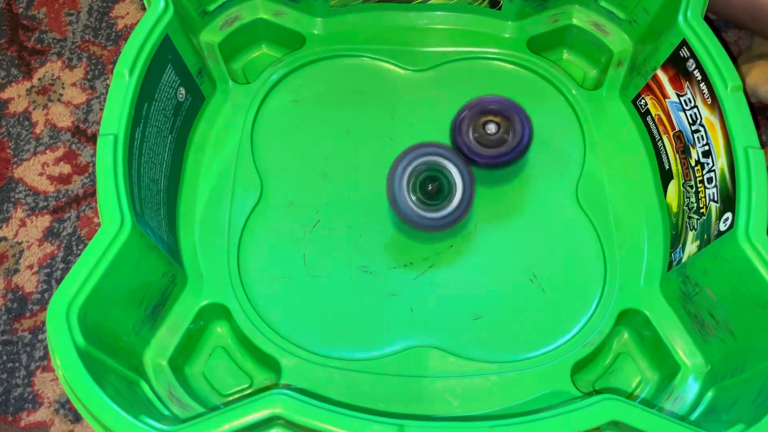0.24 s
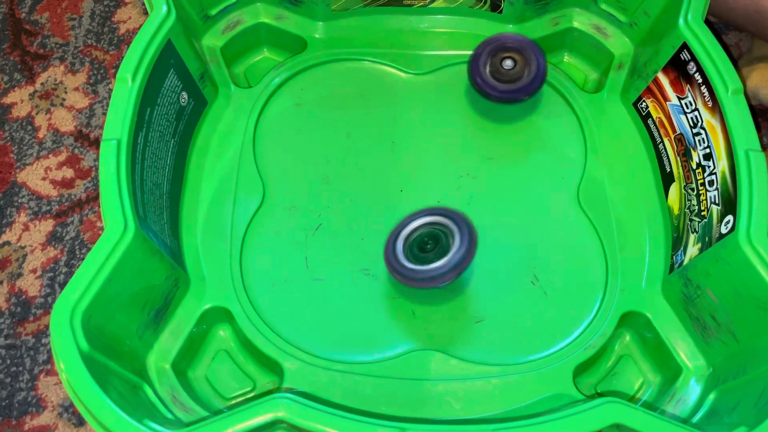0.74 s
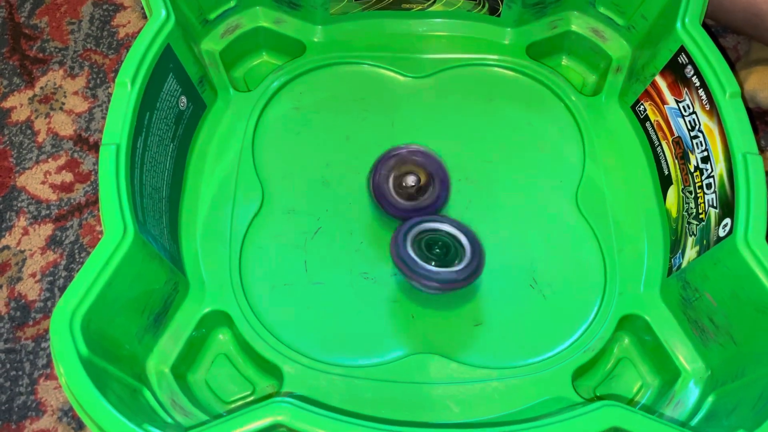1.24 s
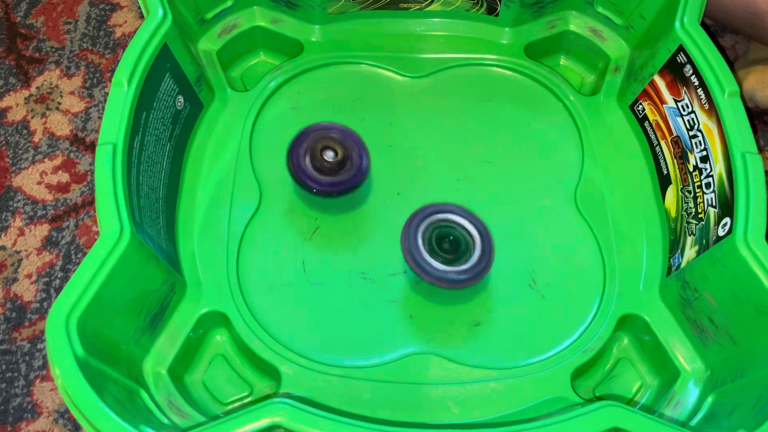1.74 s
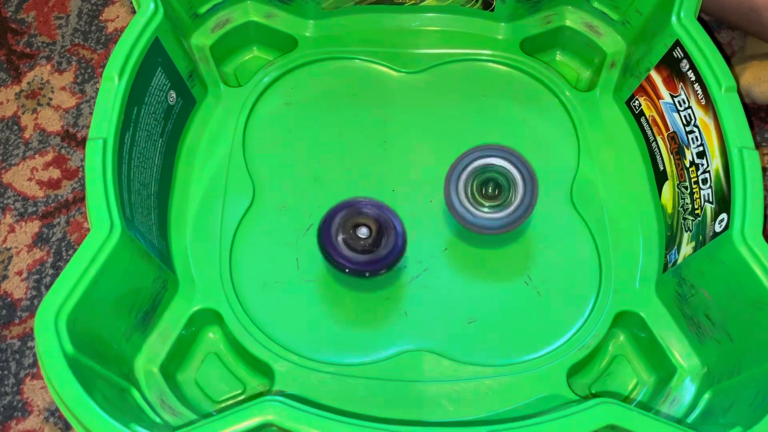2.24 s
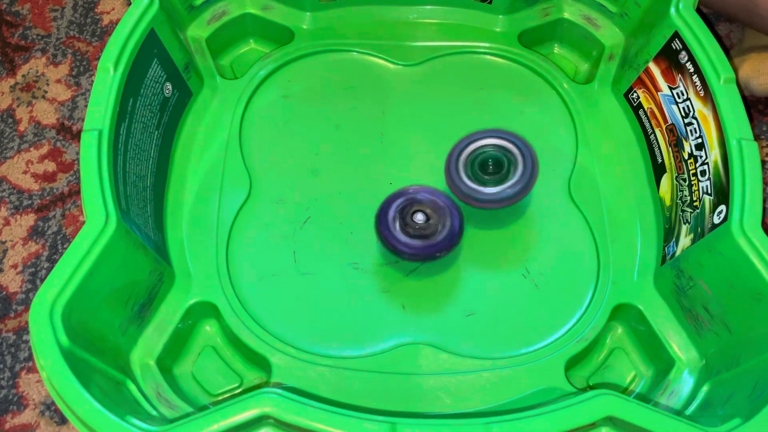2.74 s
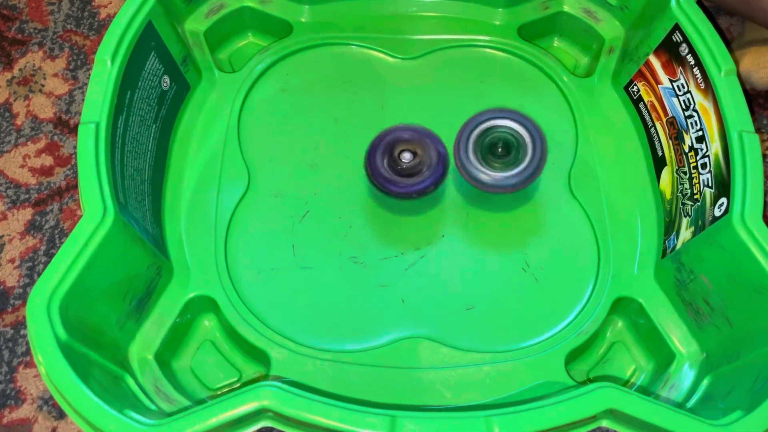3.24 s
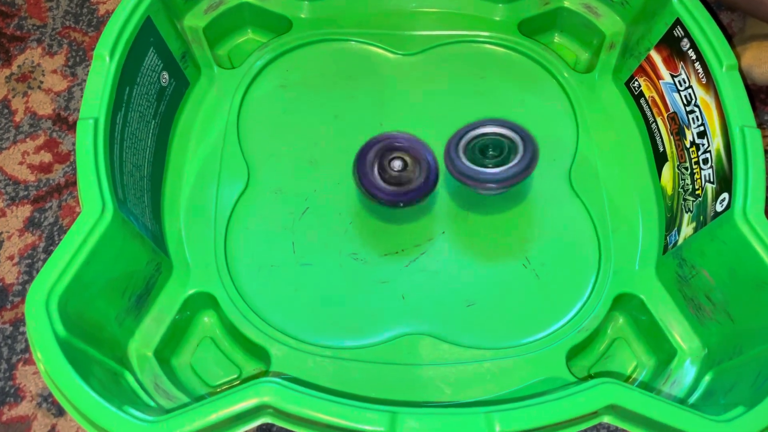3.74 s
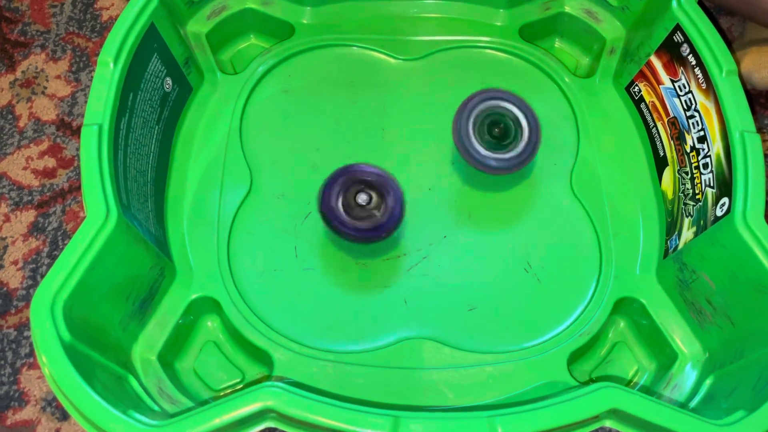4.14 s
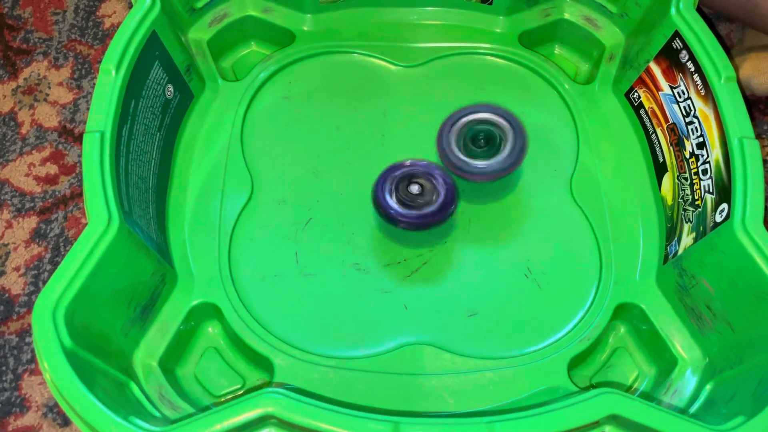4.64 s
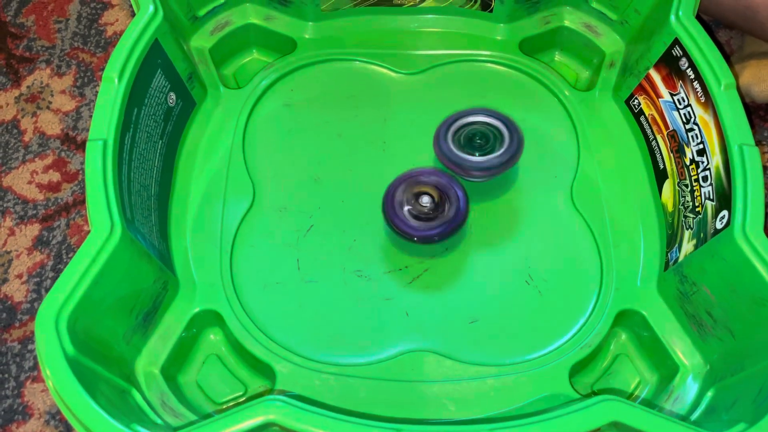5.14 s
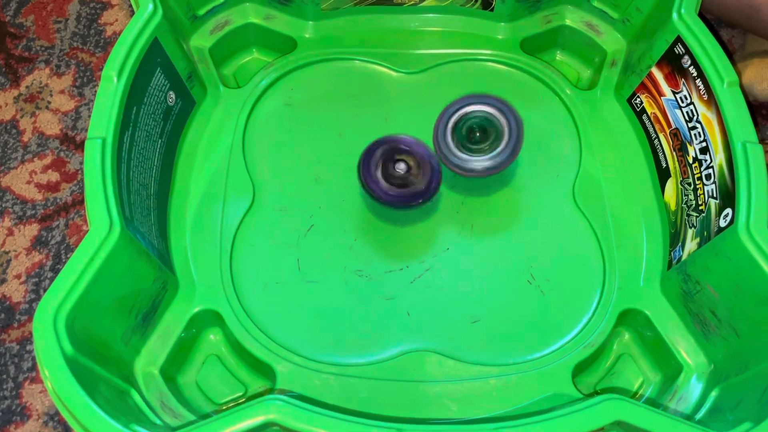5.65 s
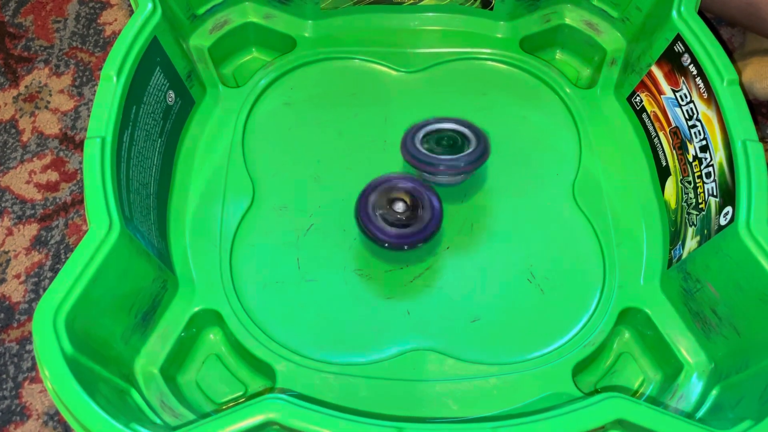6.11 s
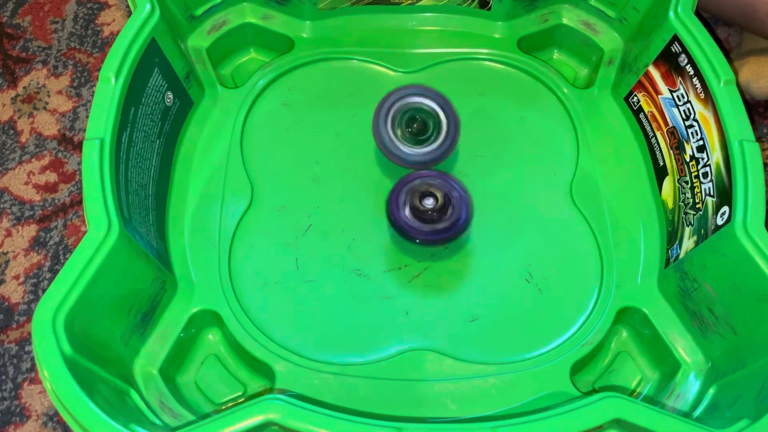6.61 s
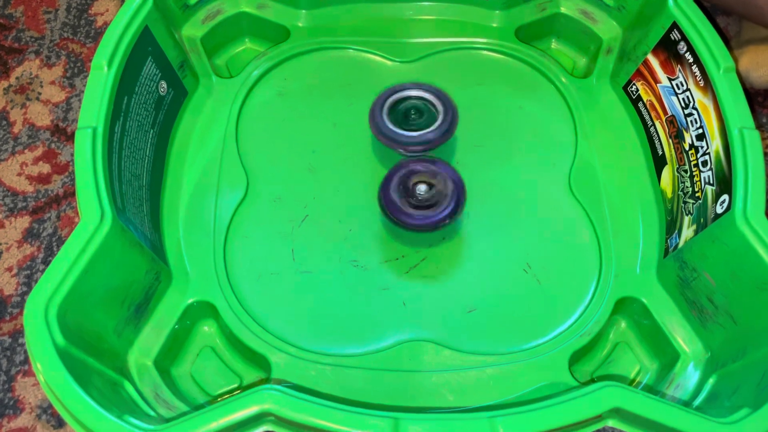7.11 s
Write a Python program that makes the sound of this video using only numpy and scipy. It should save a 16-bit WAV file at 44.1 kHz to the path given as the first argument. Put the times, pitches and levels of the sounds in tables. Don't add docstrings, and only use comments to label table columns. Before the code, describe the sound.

Two toy tops spin and collide in a thin plastic arena on carpet, heard close in stereo in a small room with a short reverberation and a constant low appliance hum. A clack at 0.1 s, then a cluster at 0.3-0.4 s, over gritty rolling and quick tip taps until about 1.1 s. Bright clashes come at 1.13 and 1.25 s, then a quieter gap. A heavy double hit at 1.95 s shakes the bowl and rings metal; more sharp cracks at 2.5, 2.6 and 2.8 s. Hollow knocking chatter runs 3.05-3.2 s, with one clack at 3.37 s. A strong ringing burst with a scrape falls at 3.85-4.0 s, followed by faint ticks. Clacks resume at 4.6-4.7 s, 5.15-5.35 s, and lighter around 5.6 s. Further hits land at 6.2, 6.6 and 6.8 s, ending with a dense, ringing clatter at 7.05-7.25 s.

```python
import sys
import numpy as np
from scipy import signal
from scipy.fft import rfft, irfft
from scipy.io import wavfile
from scipy.ndimage import map_coordinates

SR = 44100
rng = np.random.default_rng(int(sys.argv[2]) if len(sys.argv) > 2 else 0)


def int16_out(signal):
    q = np.round(np.clip(np.atleast_2d(signal).T, -1, 1) * 32767)
    wavfile.write(sys.argv[1], SR, q.astype(np.int16))


def how_loud(loudness_db):
    steps = np.asarray(loudness_db, float) / 20
    return 10 ** steps


N = 325084
HZ = np.arange(N + 1) * SR / (2 * N) + 1e-3
RATTLE_TOP_HZ = 15800


def rms_one(x):
    return x / np.sqrt(np.mean(x ** 2) + 1e-20)


def in_time(rows):
    s, *columns = np.transpose(rows)
    return [np.interp(np.arange(N) / SR, s, c) for c in columns]


def at_hz(points, hz):
    points = np.array(points)
    return np.interp(np.log(hz), np.log(points[:, 0]), points[:, 1])


def drift(rate_hz):
    step = 40
    r = np.exp(-2 * np.pi * rate_hz * step / SR)
    slow = signal.lfilter([1], [1, -2 * r, r * r], rng.standard_normal(N // step + 2002))[2000:]
    return np.interp(np.arange(N) / step, np.arange(len(slow)), rms_one(slow))


def coloured(points, channels=1):
    white = rng.standard_normal((channels, 2 * N))
    return rms_one(irfft(rfft(white) * how_loud(at_hz(points, HZ)))[:, :N])


# f/Hz, likeness (0-1)
PORT_COHERENCE = [(60, 0.5), (300, 0.3), (1000, 0.14), (3000, 0.2), (6000, 0.29), (7600, 0.93),
                  (16000, 0.3)]


def diffuse(mid, side):
    alike = np.clip(at_hz(PORT_COHERENCE, HZ), 0, 1)
    mid = rfft(mid, 2 * N) * np.sqrt(1 + alike)
    side = rfft(side, 2 * N) * np.sqrt(1 - alike)
    return irfft(np.array([mid + side, mid - side]))[:, :N] / np.sqrt(2)


def ring(force, hz, t60):
    r, w = how_loud(-60 / (t60 * SR)), 2 * np.pi * hz / SR
    return signal.lfilter([0, np.sin(w)], [1, -2 * r * np.cos(w), r * r], force + 1e-18)


def struck(modes, force, owner, level_db, scatter_db, width=0):
    luck = rng.standard_normal((len(level_db), 2, len(modes)))
    rung = []
    for k, (hz, mode_db, t60) in enumerate(modes):
        strength = how_loud(level_db + mode_db + scatter_db * luck[:, 0, k])
        sign = np.sign(luck[:, 1, k])
        rung.append(ring(force * (strength * sign)[owner], hz, t60))
    side = width * (sum(rung[::2]) - sum(rung[1::2]))
    return np.array([sum(rung) + side, sum(rung) - side])


def single_blows(times):
    at, blows = np.round(times * SR).astype(int), np.zeros(N)
    blows[at] = 1
    owner = np.searchsorted(at, np.arange(N), side="right") - 1
    return blows, np.maximum(owner, 0)


# f/Hz, rms level/dB
MACHINE_TONES = [
    (60, -60),
    (83.6, -55),
    (120, -54),
    (167, -60),
    (240, -65),
    (250.5, -68),
    (334, -71),
    (501, -70),
]
# f/Hz, level/dB per Hz
AIR_SPECTRUM = [(40, -3), (200, -7), (650, 1.5), (1200, -2.5), (1750, -7), (2500, -9.5), (4000, -19.5),
                (10000, -64)]


def hum():
    t, tones = np.arange(N) / SR, 0
    for hz, db in MACHINE_TONES:
        level = np.sqrt(2) * how_loud(db + 0.5 * drift(3.8))
        tones = tones + level * np.sin(2 * np.pi * hz * t + 0.21 * drift(2.2))
    return tones + how_loud(-52.5) * diffuse(*coloured(AIR_SPECTRUM, channels=2))


# f/Hz, level/dB, t60/s
SHEET_MODES = [(185, -11, 0.0099), (253, -24, 0.073), (372.5, -13, 0.067), (537, -7.5, 0.0053),
               (657, -12, 0.04), (686.4, -6.5, 0.044), (758, -5.5, 0.033), (835, -12.5, 0.083),
               (860, -4.5, 0.023), (930, -17.5, 0.083), (1033, -3, 0.02), (1109, 3.5, 0.012),
               (1206, 1.5, 0.0085), (1302, 2.5, 0.011), (1298, -7, 0.029), (1516, -5, 0.0028),
               (2710, -10, 0.027), (2675, 2.5, 0.0068)]
SHEET_WIDTH = 0.13
# f/Hz, level/dB, t60/s
BOWL_MODES = [(49, -22.5, 0.024), (68, -4, 0.1), (83.3, -0.5, 0.24), (111, 1, 0.014), (129.3, -2, 0.13),
              (161, -14, 0.34), (242, 2.5, 0.014)]
# t/s, unbalance shaking the bowl level/dB, grinding on the sheet level/dB
ROLL_COURSE = [(0.0, -35.5, 10.5), (0.33, -29.5, 12.5), (0.63, -30, 8), (1.07, -38.5, 9.5), (1.37, -42, 1),
               (1.75, -43.5, -6), (2.0, -39.5, 5), (2.36, -40, -3.5), (2.87, -45, -2.5), (3.24, -31, 3),
               (3.47, -45, -6.5), (3.88, -36, -1), (4.02, -30.5, 17.5), (4.12, -47, 3), (4.6, -43, -2),
               (5.35, -42, 0.5), (7.08, -42.5, -6), (7.3, -35, 8.5)]
# f/Hz, level/dB per Hz
HISS_SPECTRUM = [(1500, 7), (2600, 5), (3300, 4), (5000, 4), (7500, 2), (10000, -9.5), (13000, -11.5),
                 (15500, -12.5)]


def rolling():
    bowl_db, grind_db = in_time(ROLL_COURSE)
    whirr_db, hiss_db = -57, -61
    load = how_loud(3.2 * drift(25))
    grit = rng.standard_normal(N) * how_loud(7.4 * drift(150))
    whole = np.zeros(N, int)
    damped = [(hz, db, .6 * t60) for hz, db, t60 in BOWL_MODES]
    rumble = struck(damped, rng.standard_normal(N), whole, np.zeros(1), 0)
    whirr = struck(SHEET_MODES, grit, whole, np.zeros(1), 0, SHEET_WIDTH)
    hiss = rms_one(coloured(HISS_SPECTRUM)[0] * how_loud(2.0 * drift(110)))
    sheet = how_loud(whirr_db + grind_db) * rms_one(whirr) + how_loud(hiss_db + grind_db) * hiss
    return how_loud(bowl_db - 4.0) * rms_one(rumble) + load * sheet


def chatter(times, contact_ms, rough_db):
    force, t_ms = np.zeros(N + 2048), np.arange(2048) / SR * 1000
    shape = (len(times), len(t_ms))
    grains = rng.standard_normal(shape) * how_loud(rough_db * rng.standard_normal(shape))
    for s, ms, grain in zip(times, contact_ms, grains):
        ms = np.clip(ms, .5, 20)
        rise = 1 - np.exp(-t_ms / 0.16)
        fall = np.exp(-(t_ms / ms) ** 2) + 0.23 * np.exp(-t_ms / 12)
        burst = grain * rise * fall
        snap = .22 * (np.abs(t_ms - 1.3) < .012)
        force[round(s * SR):][:len(t_ms)] += burst / np.sqrt(np.sum(burst ** 2)) + snap
    owner = np.searchsorted(np.round(np.array(times) * SR), np.arange(N), side="right") - 1
    return force[:N], np.maximum(owner, 0)


# f/Hz, level/dB per Hz
CRACK_SPECTRUM = [(150, -47.5), (600, -7.5), (1400, -4.5), (2300, 2), (3300, -5), (5000, 0.5), (7500, 2),
                  (9200, -2), (12500, -11.5), (15500, -8.5)]
# f/Hz, level/dB, t60/s
SHELL_MODES = [(2590, -1, .016), (4200, -5, .007), (4850, -5, .007), (5550, -4, .007), (6700, 0, .008),
               (8200, -4, .005), (11600, -9, .004), (15700, -10, .004)]


def plastic(s, peak_db, knock_db, ms, dull_hz, arena_db, shaken_ms):
    crack_db, shell_db, sheet_delay_s = 18.5, -19.0, 0.000981
    force, owner = chatter(s, ms, rough_db=6.5)
    colour = how_loud(at_hz(CRACK_SPECTRUM, HZ)) / np.sqrt(1 + (HZ / dull_hz) ** 2)
    crack = irfft(rfft(force * how_loud(peak_db + crack_db)[owner], 2 * N) * colour)[:N]
    shells = struck(SHELL_MODES, force, owner, peak_db + shell_db, scatter_db=6.0, width=1.0)
    shove, owner = chatter(s + sheet_delay_s, ms + shaken_ms, rough_db=5.0)
    sheet_db = peak_db + knock_db + arena_db
    arena = struck(SHEET_MODES, shove, owner, sheet_db, scatter_db=1.5, width=SHEET_WIDTH)
    return crack + shells + arena


# t/s, peak level/dB, arena knock level/dB re peak
TIP_SKIPS = [(0.016, -32, -33), (0.0486, -31.5, -4.5), (0.7616, -24, -33), (0.796, -19, -28),
             (1.647, -36, -5.5), (1.7659, -43.5, -7), (1.8994, -29, -35), (2.0061, -19, -5),
             (2.0306, -24.5, -5.5), (2.0595, -31, -11), (2.66, -32.5, -1.5), (2.8018, -29, -14),
             (2.8327, -37, -4), (2.8779, -35.5, -18), (3.679, -31, -12.5), (3.938, -24, -10),
             (4.8314, -43, -14.5), (4.8962, -42, -3), (4.9848, -39.5, 1), (5.0, -38.5, -28),
             (5.393, -38, 4), (5.542, -46.5, 5), (5.949, -44.5, 3.5), (6.2956, -29, -10), (6.319, -42, 6),
             (6.3591, -36, 0), (6.4478, -37.5, -3), (6.8703, -39.5, 0.5), (6.9537, -37.5, -1.5),
             (7.2803, -28, 2)]
# first tap t/s, last tap t/s, first level/dB, last level/dB, arena knock level/dB re peak
WOBBLE_SPELLS = [(0.157, 0.2918, -23, -19.5, -5.5), (0.434, 0.576, -26.5, -22.5, -0.5),
                 (0.617, 0.7877, -20.5, -28.5, -0.5), (0.829, 0.8628, -26, -29.5, 2),
                 (0.907, 0.98, -32.5, -41, 3.5), (1.01, 1.116, -30.5, -33, -1.5),
                 (2.0926, 2.248, -35.5, -40, -2), (2.29, 2.49, -37.5, -32.5, -3),
                 (3.455, 3.493, -33.5, -33, -6), (3.628, 3.674, -34.5, -57, -4),
                 (3.798, 3.841, -39, -39.5, -1), (4.111, 4.21, -37.5, -35.5, 1.5),
                 (4.255, 4.394, -40.5, -39, -3), (4.486, 4.534, -55, -43, -2),
                 (5.062, 5.113, -35.5, -44, -14), (5.783, 5.8274, -43.5, -36, -0.5),
                 (6.434, 6.549, -42, -33.5, -3.5)]


def tip_taps():
    turn_s, slowing = .032, .0036
    rows = list(TIP_SKIPS)
    for first, last, first_db, last_db, knock_db in WOBBLE_SPELLS:
        turns = max(round((last - first) / (turn_s + slowing * first)), 1)
        luck_db = -0.3 * rng.standard_normal(12)
        for k in range(turns + 1):
            tap_s = first + (last - first) * k / turns
            tap_db = first_db + (last_db - first_db) * k / turns + luck_db[k]
            rows.append((tap_s, tap_db, knock_db))
    s, peak_db, knock_db = np.transpose(sorted(rows))
    contact_ms = np.full(len(s), 6.1)
    return plastic(s, peak_db, knock_db, contact_ms, dull_hz=4670, arena_db=-3.0, shaken_ms=5.9)


def pitched(rows, cycles, rise_cycles, trim_db, detune):
    out, t = np.zeros(N + SR // 4), np.arange(SR // 4) / SR
    for s, db, hz in rows:
        lean, phase = rng.uniform(-1, 1, 2)
        turn = hz * t
        second = np.sin(2 * np.pi * turn * (1 + detune * np.sign(lean)) + phase)
        pair = np.sin(2 * np.pi * turn) + 0.55 * second
        envelope = how_loud(db + trim_db - 60 * turn / cycles) * (1 - np.exp(-turn / rise_cycles))
        out[round(s * SR):][:len(t)] += envelope * pair
    return out[:N]


# t/s, peak level/dB, f/Hz
CAP_PINGS = [(0.0996, -16, 2140), (0.1174, -29, 2540), (0.158, -25, 2830), (0.2946, -27, 2680),
             (0.3161, -22, 2100), (0.341, -17, 2540), (0.4339, -18, 2810), (0.6394, -28, 2700),
             (0.6918, -24.5, 2710), (0.7268, -22, 2700), (0.7995, -25, 2720), (0.9782, -28, 2700),
             (1.011, -23, 2690), (1.05, -29, 2740), (1.0809, -32, 2700), (1.1178, -27, 2700),
             (1.1386, -22, 3060), (1.1474, -23, 2520), (1.246, -28, 2140), (1.899, -29, 2160),
             (1.9369, -17, 3000), (1.9585, -22.5, 2480), (2.5124, -9.5, 2730), (2.5767, -18, 2700),
             (2.774, -16.5, 2520), (2.8024, -21, 2550), (2.8335, -25.5, 2610), (2.8788, -25, 2700),
             (3.052, -15, 2640), (3.1972, -16, 2250), (3.3663, -26, 2230), (3.857, -18, 2600),
             (3.8782, -7, 2670), (3.91, -15.5, 2740), (3.968, -11, 2800), (3.989, -7.5, 2500),
             (4.622, -25.5, 2670), (4.7305, -8, 2454), (5.2643, -22, 2580), (5.2859, -18, 2690),
             (5.329, -16, 2600), (5.3484, -15.5, 2700), (5.6074, -34, 2620), (6.2362, -19.5, 2700),
             (6.268, -21, 2760), (6.6142, -16, 2270), (6.6971, -20, 2640), (7.0585, -14, 2500),
             (7.069, -17, 2680), (7.164, -22, 2640), (7.2178, -11, 2870), (7.2287, -10, 2730)]


def cap_pings():
    return pitched(CAP_PINGS, cycles=32.0, rise_cycles=2.5, trim_db=0.5, detune=0.062)


# t/s, peak level/dB, f/Hz
TOOTH_CHINKS = [(0.0996, -15, 7140), (0.2257, -20, 4680), (0.316, -12, 4500), (0.3428, -16, 6000),
                (0.383, -5.5, 6490), (1.1335, -8, 5840), (1.1414, -11, 6540), (1.245, -5, 7300),
                (1.899, -21.5, 4960), (1.938, -11.5, 4100), (2.5111, -7, 6230), (2.5779, 1.5, 6850),
                (2.7725, -20, 6700), (3.0519, -12, 6780), (3.1975, -12, 4700), (3.3667, -17, 4330),
                (3.9652, -8, 6620), (3.988, -8, 5940), (3.9988, -8, 4630), (4.6223, -4.5, 5550),
                (4.6352, -6.5, 4070), (4.7315, -20, 5030), (5.1663, -5.5, 6300), (5.2628, -13, 4870),
                (5.3292, -15, 5000), (5.6066, -10, 5800), (6.2104, -15, 6470), (6.6138, -5.5, 6140),
                (6.7804, -8, 6470), (7.218, -13, 5900)]


def tooth_chinks():
    return pitched(TOOTH_CHINKS, cycles=77.0, rise_cycles=3.9, trim_db=-4.0, detune=0.063)


# t/s, peak level/dB
TOOTH_SPITS = [(0.1002, -24), (0.383, -28), (1.1338, -28), (1.2456, -22), (1.9375, -31), (1.9574, -24.5),
               (2.5102, -42), (2.579, -20), (2.7716, -35.5), (3.053, -37), (3.1173, -37.5), (3.1976, -34.5),
               (3.3667, -30), (3.8776, -30), (4.6214, -31), (4.7306, -32), (5.1667, -42.5), (5.2435, -33),
               (5.3288, -45), (5.5932, -40), (5.684, -37), (6.2108, -34.5), (6.6144, -38.5), (6.781, -26.5),
               (7.0569, -31), (7.1901, -27.5)]


def spits():
    rise_ms, trim_db, side_share = 1.2, 10, .35
    out, t_ms = np.zeros((2, N + 512)), np.arange(512) / SR * 1000
    envelope = (t_ms / rise_ms) * np.exp(1 - t_ms / rise_ms)
    for s, db in TOOTH_SPITS:
        mid, side = rng.standard_normal((2, len(t_ms)))
        burst = (mid + side_share * side * np.array([[1], [-1]])) * envelope
        out[:, round(s * SR):][:, :len(t_ms)] += how_loud(db + trim_db) * burst
    return signal.sosfilt(signal.butter(2, 7600, "high", fs=SR, output="sos"), out[:, :N])


# t/s, peak
# level/dB, arena knock level/dB re peak, contact/ms
RIM_CLASHES = [(0.1007, -11, -12.5, 3.8), (0.3144, -11.5, 0, 8.6), (0.3821, -5, -20.5, 5.6),
               (1.1352, -8.5, -12, 7.5), (1.245, -5.5, -11, 3.3), (1.9363, -13, -3.5, 14),
               (2.5118, -10.5, -8, 6.7), (2.5786, -9.5, -3.5, 4.4), (2.7725, -6.5, -6.5, 5.1),
               (3.0452, -21, -1.5, 10), (3.1183, -18, -3, 1.4), (3.1976, -10.5, -7.5, 4.7),
               (3.3664, -12, -11, 4.9), (3.857, -20.5, -3, 7), (3.9656, -10.5, -19, 6.4),
               (4.622, -10.5, -4, 4.2), (4.7316, -8.5, -7, 1.1), (5.1672, -11, -5.5, 0.96),
               (5.243, -13.5, -1.5, 7.1), (5.3292, -11.5, -5, 7.2), (5.5937, -27.5, -5, 6.1),
               (5.683, -16.5, -4.5, 5.9), (6.2119, -10, -9.5, 4.6), (6.6135, -17, -1.5, 1.8),
               (6.6949, -19.5, 0, 3.2), (6.7808, -10, -8, 5.5), (7.0565, -11.5, 1.5, 6.4),
               (7.1635, -16, 0, 9.6),
               (0.3259, -16, -14, 6.7), (0.3395, -11.5, -5, 6.8), (1.14, -7.5, -1.5, 3),
               (1.959, -5.5, -6.5, 3.8), (1.973, -28.5, 13, 0.53), (3.052, -12, -3, 6.4),
               (3.1288, -14.5, -5, 1.4), (3.142, -17.5, -3, 4.7), (3.148, -33, 1, 2.9),
               (3.8788, -12, -3.5, 9.5), (3.91, -21.5, 3, 4.2), (3.9885, -4.5, -10.5, 6),
               (3.9972, -7.5, -13, 5.1), (4.6329, -6, -11.5, 5.8), (5.2627, -5.5, -6, 6.2),
               (5.3467, -16.5, -2, 2.5), (5.6066, -14.5, -8, 4.3), (6.2356, -26.5, 2, 15),
               (6.2696, -31.5, 2.5, 3.9), (7.103, -17.5, 1.5, 5.5), (7.1907, -8, -2, 6.5),
               (7.217, -5, -9.5, 7.4), (7.246, -14.5, -1.5, 2.5), (3.9845, -16, -9, 4.4),
               (1.241, -28.5, -20, 5.9), (7.2073, -16.5, -5, 4), (7.2277, -22, -12, 3.5),
               (2.508, -20, -4, 3.3)]


def rim_clashes():
    blows = np.transpose(sorted(RIM_CLASHES))
    clashes = plastic(*blows, dull_hz=30000, arena_db=-7.5, shaken_ms=14.0)
    stiff = signal.butter(4, [400, RATTLE_TOP_HZ], "band", fs=SR, output="sos")
    return signal.sosfilt(stiff, clashes)


# t/s, peak level/dB, f/Hz
SHEET_KNOCKS = [(0.101, -22.5, 673), (0.161, -14, 1010), (0.321, -18, 910), (0.33, -12.5, 1080),
                (0.347, -15, 766), (0.387, -15, 786), (0.578, -22, 1340), (0.653, -20, 693),
                (0.688, -17.5, 688), (1.143, -11, 1040), (1.248, -19.5, 774), (1.964, -10, 990),
                (2.512, -12.5, 816), (2.777, -12.5, 870), (2.834, -25, 1040), (3.056, -10, 978),
                (3.124, -12, 1035), (3.147, -11, 1056), (3.204, -11, 1065), (3.368, -15.5, 1047),
                (3.862, -16, 1460), (3.881, -13, 1057), (3.987, -8, 1093), (4.117, -29, 1000),
                (4.213, -36, 673), (4.26, -35, 1190), (4.304, -31, 1050), (4.354, -34, 1260),
                (4.402, -34, 1020), (4.624, -15.5, 1110), (4.736, -15.5, 1000), (5.167, -21.5, 663),
                (5.267, -24, 1220), (5.366, -19, 1110), (5.424, -28, 1110), (5.599, -19.5, 1027),
                (5.687, -26, 707), (6.213, -17, 1217), (6.618, -11.5, 1098), (6.699, -14, 960),
                (6.786, -9.5, 978), (7.057, -21, 910), (7.281, -20, 707)]


def sheet_knocks():
    return pitched(SHEET_KNOCKS, cycles=40.0, rise_cycles=1.7, trim_db=-4.0, detune=0.087)


# f/Hz, level/dB, t60/s
RING_MODES = [
    [(4603, -2, .27), (4675, -3, .32)],
    [(4885, -5, .2), (4923, -3, .34), (4976, -4, .22)],
    [(10105, -2, .11), (10212, -1, .10)],
    [(11800, -5, .2), (11945, -4, .24), (12030, -6, .2)],
    [(12910, -5, .08)],
]
# t/s, low family level/dB, high family level/dB
FIRST_RING_BLOWS = [(0.3825, -26.5, -23.5), (1.2456, -33.5, -68.5), (1.958, -21.5, -24), (2.773, -35, -79),
                    (3.053, -28, -44), (3.198, -64, -43), (3.878, -30, -67), (3.997, -31, -25.5),
                    (4.731, -38.5, -75), (5.167, -38, -73.5), (5.263, -31, -34), (5.329, -30.5, -75),
                    (7.1906, -48, -25), (7.245, -28, -46)]
# t/s, low family level/dB, middle family level/dB, high family level/dB
SECOND_RING_BLOWS = [(0.1, -64, -30.5, -35), (0.3825, -65, -20, -84), (1.958, -59.5, -48, -16.5),
                     (2.511, -58, -25.5, -56.5), (2.5785, -31, -20.5, -35), (2.773, -67, -44, -54),
                     (3.128, -56, -36, -51), (3.198, -69, -59, -56), (3.997, -25.5, -31, -53.5),
                     (4.634, -73, -27, -53), (4.731, -69, -49, -68), (5.33, -31, -49.5, -75.5),
                     (6.211, -68, -48.5, -71), (6.7815, -76, -39, -56), (7.1906, -28, -24.5, -25),
                     (7.245, -29, -31, -39)]


def metal_rings():
    out = 0
    for table, families in ((FIRST_RING_BLOWS, RING_MODES[1::2]), (SECOND_RING_BLOWS, RING_MODES[::2])):
        s, *family_db = np.transpose(table)
        blows, owner = single_blows(s + 0.0024)
        for modes, db in zip(families, family_db):
            out = out + struck(modes, blows, owner, db - 4, scatter_db=1.5)
    swing = drift(45)
    bent_at = np.arange(N) + 1.2 * swing
    bent = [map_coordinates(side, [bent_at], mode="nearest") for side in out]
    return np.array(bent) * how_loud(4.5 * swing - 3.0)


# t/s, peak level/dB, f/Hz
WALL_THUDS = [(.156, -33.5, 161), (.257, -31, 171), (.291, -37, 238), (.384, -25, 266), (6.62, -29.5, 474),
              (1.957, -26, 150), (3.130, -22.5, 206), (3.148, -22.5, 103.6), (3.190, -30, 135),
              (3.988, -27, 196), (4.63, -33, 230), (5.264, -28, 290), (5.346, -30.5, 361), (6.23, -35, 256),
              (7.243, -20.5, 147)]


def wall_thuds():
    return pitched(WALL_THUDS, cycles=24.0, rise_cycles=0.74, trim_db=-1.0, detune=0.13)


# t/s, thump level/dB
BOWL_BOUNCES = [(0.338, -52), (0.393, -42), (1.256, -31), (1.947, -25.5), (1.969, -34), (1.984, -24.5),
                (2.521, -35), (2.784, -35.5), (3.128, -25), (3.153, -28.5), (3.174, -29.5), (3.21, -55),
                (3.38, -37), (3.891, -41), (4.009, -28.5), (4.644, -28), (4.742, -36), (5.179, -29.5),
                (5.253, -35), (5.274, -30.5), (5.341, -30.5), (5.606, -80), (6.226, -29.5), (6.265, -41),
                (6.792, -34), (7.233, -27), (7.254, -32)]


def bowl_bounces():
    s, thump_db = np.transpose(BOWL_BOUNCES)
    bounce = struck(BOWL_MODES, *single_blows(s), thump_db + 1.5, scatter_db=3.0)
    late = signal.butter(2, [40, 200], "band", fs=SR, output="sos")
    return signal.sosfilt(late, bounce)


# f/Hz, t60/s
ROOM_DECAY = [(150, 0.58), (800, 0.21), (3000, 0.23), (7000, 0.13), (13000, 0.14)]


def room(x):
    room_db, wall_echo_s, wall_echo_db = -10, .017, 5
    t, tails = np.arange(SR // 2) / SR, 0
    for low in 75 * 2 ** np.arange(8):
        band = signal.butter(2, [low, 2 * low], "band", fs=SR, output="sos")
        t60 = at_hz(ROOM_DECAY, low * np.sqrt(2))
        tails = tails + signal.sosfilt(band, rng.standard_normal((2, len(t)))) * how_loud(-60 * t / t60)
    wall = how_loud(wall_echo_db * np.exp(-((t - wall_echo_s) / .003) ** 2))
    tails = tails * (1 - np.exp(-t / .006)) * wall
    tails = tails / np.sqrt(np.sum(tails ** 2) / 2)
    return how_loud(room_db) * diffuse(*signal.fftconvolve(x[None], tails, axes=1)[:, :N])


def scene():
    near = rim_clashes() + tip_taps() + bowl_bounces() + metal_rings() + rolling()
    walls = signal.butter(3, [130, RATTLE_TOP_HZ], "band", fs=SR, output="sos")
    wet = room(signal.sosfilt(walls, near.mean(axis=0)))
    air = hum()
    notes = cap_pings() + sheet_knocks() + tooth_chinks() + wall_thuds()
    ragged = notes * how_loud(2.5 * drift(90))
    capsule = signal.butter(10, 16000, fs=SR, output="sos")
    return signal.sosfilt(capsule, near + wet + ragged + spits()) + air


def band_limit(x):
    return signal.sosfilt(signal.butter(12, 17160, fs=SR, output="sos"), x)


# f/Hz, phase/rad
PORT_PHASES = [(0, 0), (1500, .2), (2400, 1.1), (3300, .3), (4800, .8), (6000, 0), (7000, -1.7),
               (7800, -2.95), (9200, -3.7), (10600, -6.0), (12400, -6.6), (14000, -9.1), (15200, -9.5)]
# f/Hz, level/dB
PORT_LEVELS = [(60, .4), (1500, 0), (2600, 3.5), (3500, 1), (4500, 2), (5700, -1), (6800, 4), (8000, 0)]


def record(dry):
    hz, phase = np.transpose(PORT_PHASES)
    half = how_loud(at_hz(PORT_LEVELS, HZ) / 2) * np.exp(.5j * np.interp(HZ, hz, phase))
    ports = irfft(rfft(dry, 2 * N) * np.array([half, 1 / half]))[:, :N]
    ports = signal.sosfilt(signal.butter(5, 45, "high", fs=SR, output="sos"), ports)
    ports = .9 * np.tanh(ports / .9)
    ports = signal.sosfilt(signal.cheby2(16, 70, 17250, fs=SR, output="sos"), ports)
    return band_limit(ports)


dry = scene()
out = record(dry)
int16_out(out)
```